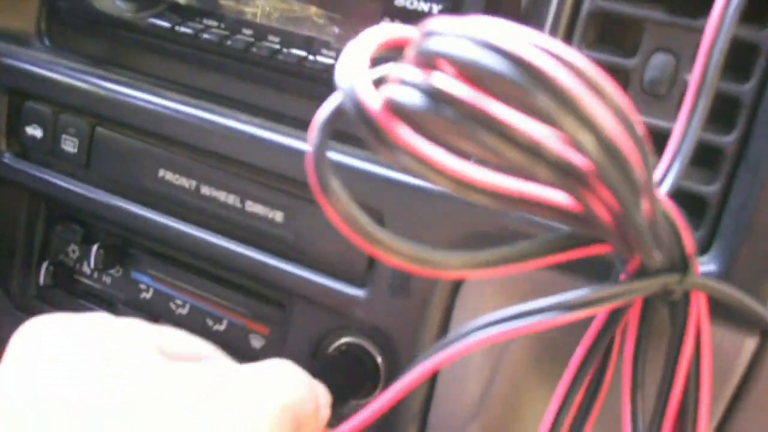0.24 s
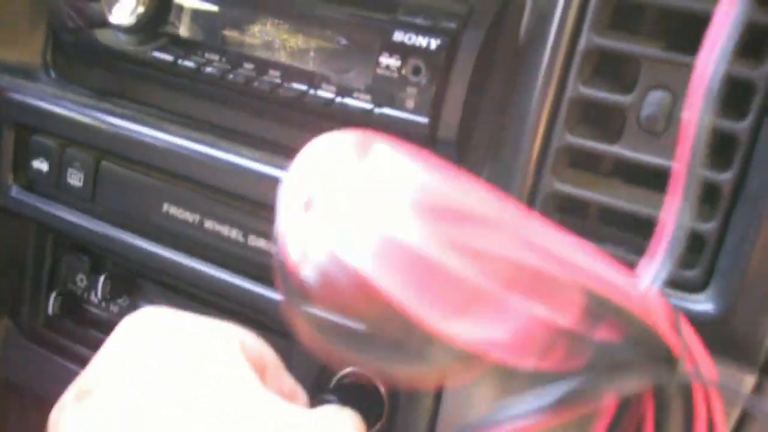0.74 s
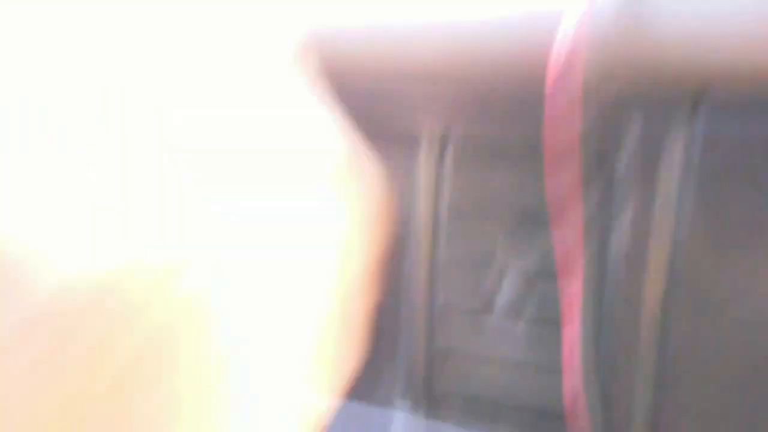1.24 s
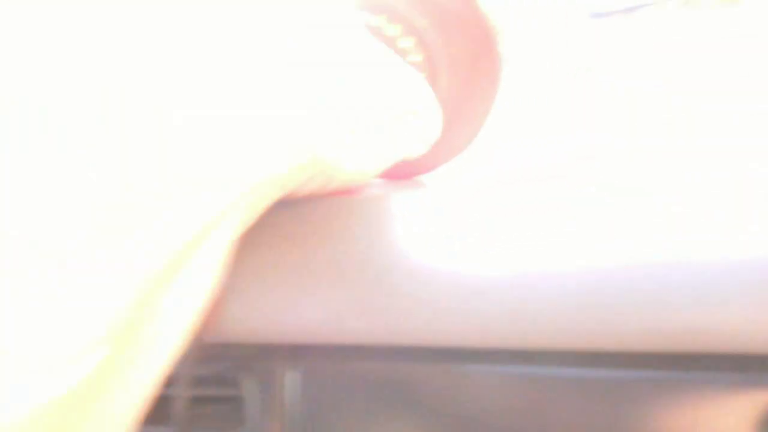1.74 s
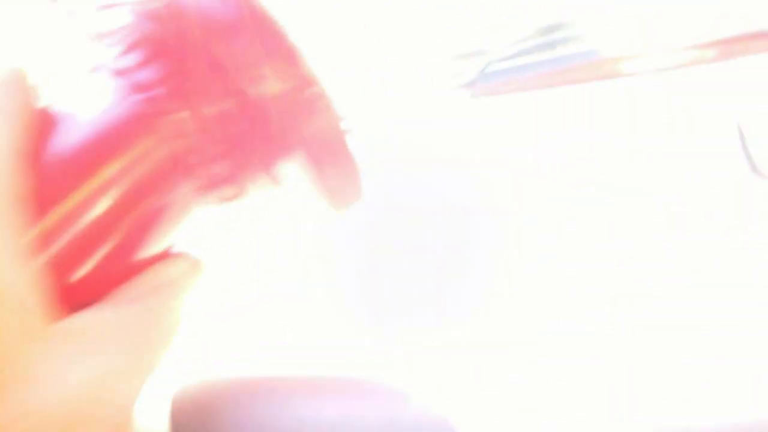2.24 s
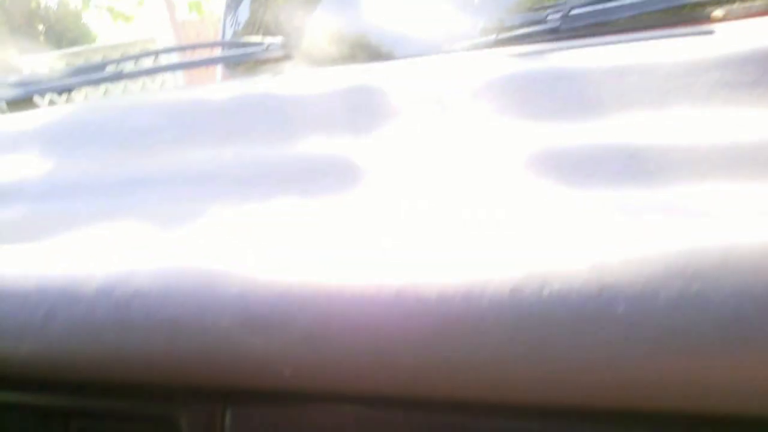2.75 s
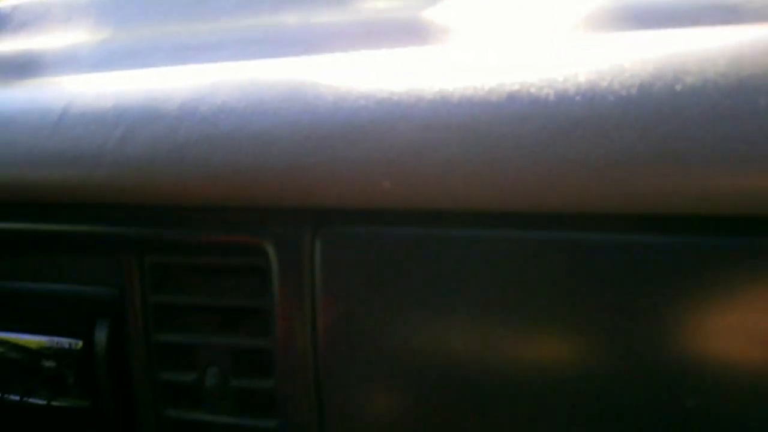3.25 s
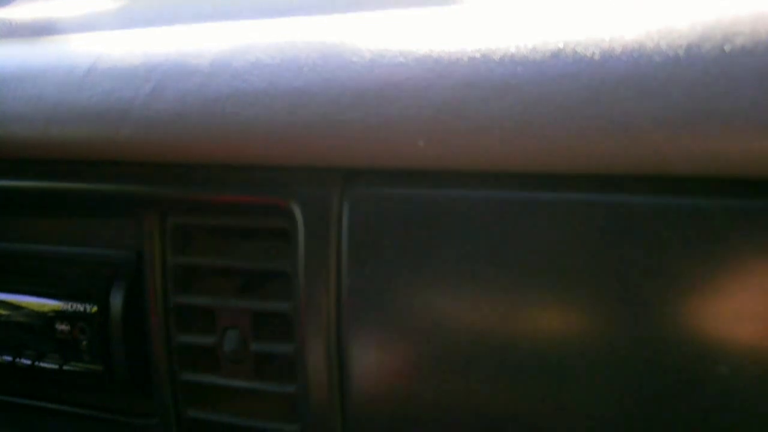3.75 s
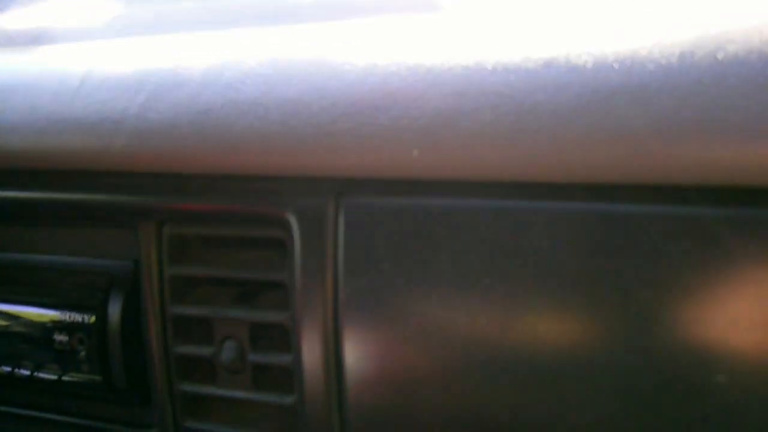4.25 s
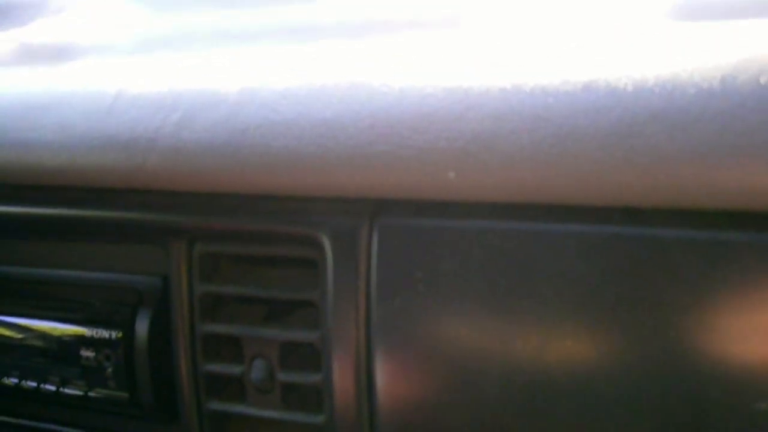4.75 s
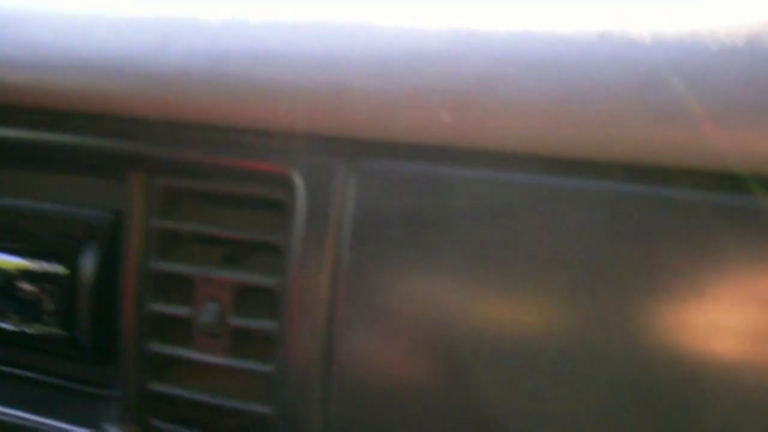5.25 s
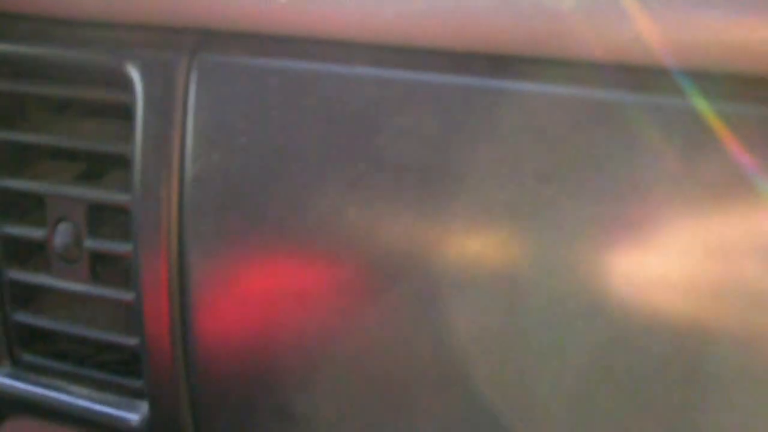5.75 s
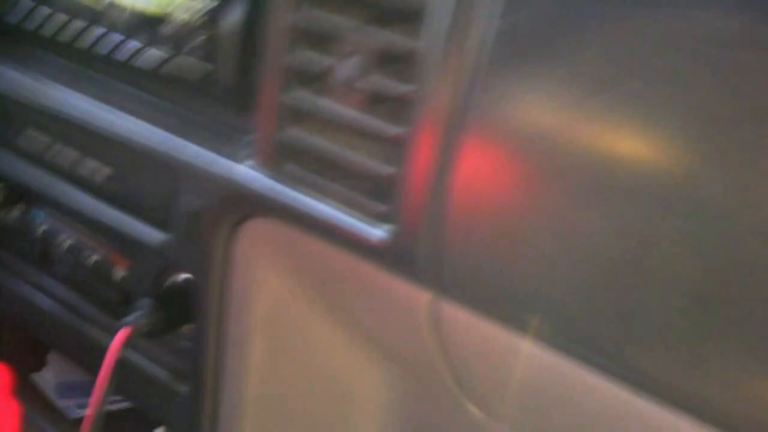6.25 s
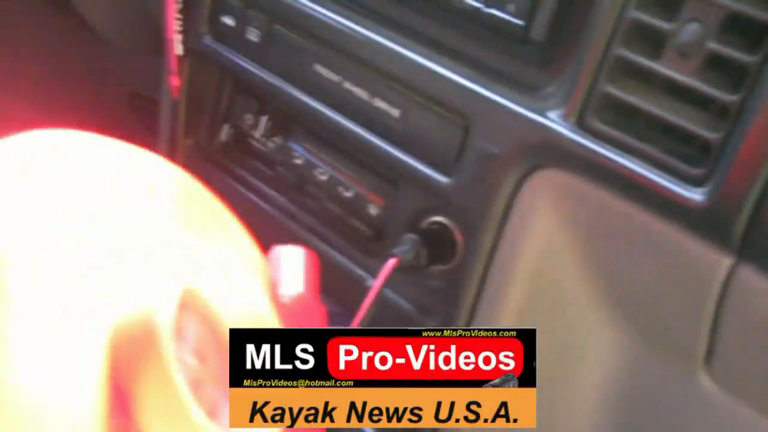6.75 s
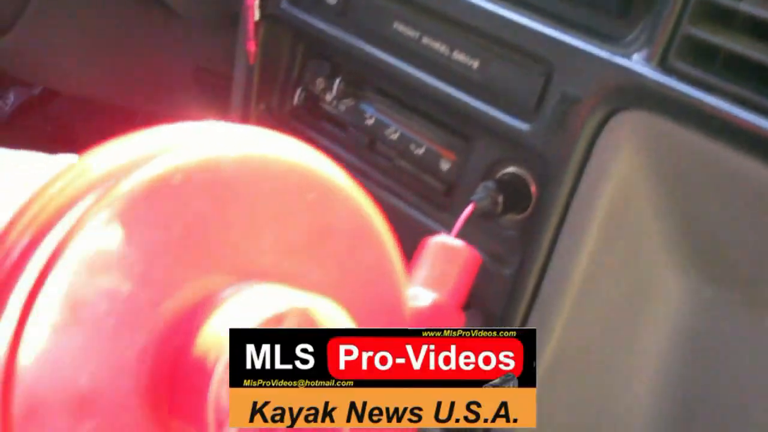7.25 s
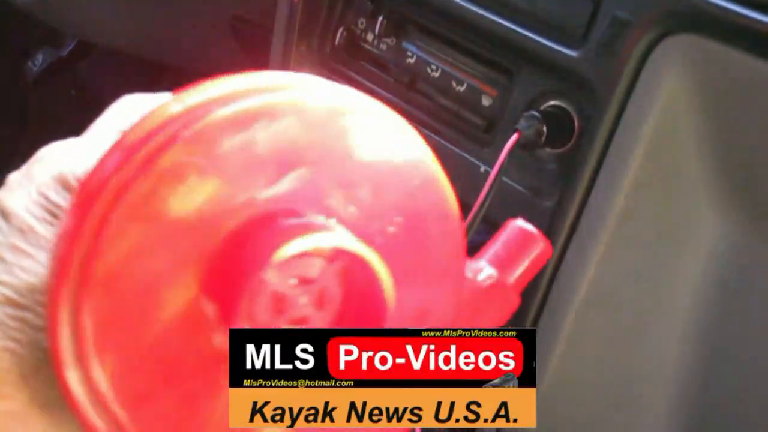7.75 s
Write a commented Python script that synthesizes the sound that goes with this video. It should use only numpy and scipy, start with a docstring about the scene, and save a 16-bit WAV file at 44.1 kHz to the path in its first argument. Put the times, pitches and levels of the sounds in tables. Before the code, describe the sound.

Close, thin-bass sound inside a parked car: hollow hum and hard plastic knocks as a plug is fumbled into a socket, a brief dip, then a small electric blower whines up with rushing air. Switched off, it coasts down through a whirr to near quiet, clicks, and revs again into a steady whine until the end.

```python
"""First a hollow hum in a parked car, with knocks as a hand fumbles a plug into a socket.
The sound dips to near silence, then a switch clicks and a small seven-vane blower whines up, coasts down
and is switched on again to a steady whine. Its tones are sines locked to the turning shaft, over rushing
air made of shaped noise; the pump turns in the hand, so the tones come and go.
Knocks are noise bursts with ringing sines; the car and the rumble outside are shaped noise."""
import sys
import numpy as np
from scipy import signal
from scipy.fft import rfft, irfft
from scipy.io import wavfile
from scipy.ndimage import uniform_filter1d

SR = 44100
rng = np.random.default_rng(int(sys.argv[2]) if len(sys.argv) > 2 else 0)


def dump_mix(stems):
    """Bounce the given channels to the path in sys.argv[1] as a 16-bit WAV at rate SR."""
    frames = np.atleast_2d(stems).T  # one column per channel
    limited = np.clip(frames, -1, 1)  # hard clip at full scale
    pcm = np.round(limited * 32767).astype(np.int16)
    wavfile.write(sys.argv[1], SR, pcm)


def volts_from_decibels(level):
    """Turn decibel levels (scalar or array-like) into linear amplitude factors."""
    exponent = np.asarray(level, float) / 20
    return 10 ** exponent


N = 352800

T = np.arange(N) / SR  # time of every sample, s
FINE_T = np.arange(0, N / SR, 1 / 1000)  # slower clock for speeds and levels, s
EDGE_HZ = 15250  # top edge of the finished sound
# strong tones of the rotor: multiples of the shaft speed
STRONG_ORDERS = (1, 2, 3, 7, 14, 21, 28, 42)
# each run of the motor: on_s, off_s, top_shaft_speed_hz (before a small drift), spin_up_time_constant_s
MOTOR_RUNS = [(0.802, 2.017, 268.1, .279), (4.874, 8.0, 268, .275)]
# colour of the rushing air: frequency_hz, relative_level_db (per Hz)
AIR_COLOUR = [(40, -49.0), (100, -78), (200, -21), (400, -24), (680, -15), (1200, -8), (2100, -5.5),
              (3100, -0.5), (3600, -0.5), (4300, -5), (5200, -5.5), (7200, -6), (8800, -5), (10300, -4),
              (12500, -9.5), (15300, -12.5)]
# casing resonances, plain while coasting: frequency_hz, width_hz, relative_level_db
CASING_RINGS = [(760, 260, 3), (2470, 110, 0), (3350, 300, -5), (4180, 240, 1), (4950, 140, -6),
                (5500, 160, -7), (6900, 250, -8), (9800, 1200, -6), (11500, 1500, -8)]
# the pump as it is held and turned, all as changes:
# time_s, level_db, low_roar_db, top_hiss_db, shaft_tone_db
HAND_MOVES = [(.85, -3.5, 10, -5.5, 4.5), (1.2, -1.5, 12, 6, 18.5), (1.26, 3, 6, -1, 11),
              (1.31, -1.5, 3, 15.5, 5), (1.38, -0.5, -3, 8.5, 11), (1.45, 0.5, -4, 5, 1),
              (1.55, 0.5, -7, -4.5, 1.5), (2.0, 0.5, 0.5, -2.5, -1.5), (2.2, 2.5, 7.5, 2, -1.5),
              (2.35, 3.3, 5.5, 2, -4), (3.0, -1, 6, -1.5, -13), (3.7, -2.5, 6.5, -3.5, -18),
              (4.8, -1.5, -3, 1.5, -18), (4.92, 0.5, 6, -2, -24), (5.05, -0.5, 6.5, 1.5, -14),
              (5.2, 3.5, 2, 1, -11), (5.3, 3, 2.5, 4, -4), (5.6, 0, -1.5, 2.2, -7.5),
              (5.8, -1.5, -2.5, 3.5, 2), (6.2, 0, -3.5, 5.5, 3), (6.5, -2, -6, 2, 2),
              (7.1, -2.5, -8.5, 2.5, -11), (7.55, -1.5, -9.5, 1.5, -15), (8, -1.5, -7, 2.5, -18)]


def shaft_speed(t):
    """Under power the speed closes on its top value; switched off it coasts against drag and friction."""
    # wander of the speed: time_s, change_hz
    speed_drift = [(6.9, 0), (7.45, -.45), (8, .3)]
    # air drag and bearing friction: speed = coast_hz * tan(angle), the angle falling steadily
    coast_hz, fall_rad_per_s = 76.55, .2881
    growl_lag_s = .012  # the growl sets in just after the rotor begins to gain speed
    speed, powered = np.zeros(len(t)), np.zeros(len(t))
    for on, off, top_hz, time_constant_s in MOTOR_RUNS:
        start = np.interp(on, t, speed)
        since = np.clip(t - on, 0, off - on)
        rising = top_hz - (top_hz - start) * np.exp(-since / time_constant_s)
        coast_angle = np.arctan(rising / coast_hz) - fall_rad_per_s * np.maximum(t - off, 0)
        speed = np.where(t > on, coast_hz * np.tan(np.maximum(coast_angle, 0)), speed)
        powered += (t > on + growl_lag_s) & (t <= off)
    return speed + np.interp(t, *np.transpose(speed_drift)), uniform_filter1d(powered, size=12)


def rush_db(t):
    """Level, roar and hiss of the air at times t, from speed, power and the way the pump is held."""
    # air against speed: shaft_speed_hz, relative_level_db, low_roar_lift_db, top_hiss_lift_db
    air_by_speed = [(20, -84, 22, 12), (45, -63, 8.5, 4), (64.6, -58.5, 5.5, 9), (83.3, -51, 3, 3.5),
                    (122.3, -44.5, 4, -1.5), (162.5, -38.5, 3, -3.5), (199, -38, -3.5, -5),
                    (248, -35.5, 9, -1.5)]
    speed, powered = (np.interp(t, FINE_T, v) for v in shaft_speed(FINE_T))
    speed_hz, *by_speed = np.transpose(air_by_speed)
    s, *by_hand = np.transpose(HAND_MOVES)
    level, roar, hiss = (np.interp(speed, speed_hz, a) + np.interp(t, s, b)
                         for a, b in zip(by_speed, by_hand))
    # a slow rotor under power is louder and roars more
    pulling = powered * np.clip(1 - speed / 230, 0, 1)
    level = np.where(t > MOTOR_RUNS[0][0], level + 11 * pulling, -120)
    return level, roar + 2.5 * pulling, hiss


def buried_db(t):
    """Tones are lost in the growl while the motor pulls up from low speed."""
    most_db, below_hz = -11, 180
    speed, powered = shaft_speed(FINE_T)
    return np.interp(t, FINE_T, most_db * powered * np.clip(2 - 2 * speed / below_hz, 0, 1))


def rotor():
    """Speed, shaft angle and the levels of the strong tones, sample by sample."""
    # one row per strong order: level_against_air_db, change_while_coasting_db
    strong_levels = [(-12.5, 1), (-11.5, -6.5), (-14.5, -14), (2.5, -3), (-1, 0), (-2, 3), (-6.5, 5.5),
                     (-17, -3.5)]
    # how casing and cabin pass a tone: frequency_hz, gain_db
    tone_path = [(70, -30), (110, 0), (200, -15.5), (265, -5), (400, -11.5), (460, -3), (560, 7), (700, 8),
                 (800, -3.5), (1000, -2.5), (1200, -3), (1500, -4.5), (1750, 2), (1880, -5), (2200, 2.5),
                 (2600, 5), (2900, 7.5), (3150, 5), (3350, 1), (3550, 1.5), (3750, 3), (4000, -3.5),
                 (4400, -2), (4800, -10.5), (5200, 6), (5600, 3.5), (6000, 6), (6500, 13), (7500, -.5),
                 (11200, 12.5)]
    # the second order swells and fades: time_s, change_db
    second_order_swell = [(1.2, 0), (1.45, -5), (1.9, -14), (2.15, -7.5), (5.3, -6), (5.6, -3), (5.95, 4),
                          (6.4, 2), (7.2, -1.5), (8, -6.5)]
    # vane tones swell and fade as the pump turns:
    # time_s, order_7_db, order_14_db, order_21_db, order_28_db, order_42_db
    vane_swell = [(1.23, -5, 1.5, 2.5, -16, -8), (1.32, -19, -11, 6, -2.5, -8),
                  (1.45, -5, -2, -5.5, -29, 1.5), (1.68, -1.5, 6.5, -5, -13, -0.5),
                  (1.9, -0.5, 3, -9, 1, 5), (2.05, -8, -2.5, -9, -17, 4), (2.3, -3.5, -1.5, -8, -14, 2),
                  (2.7, -4, -9, -1.5, -1, -.1), (3.0, 4, -5, -5.5, -17.5, 7), (3.6, 0, 0, -10, -8.5, -3),
                  (4.15, -12, -6, -17, -15, -11), (4.85, 1, -8, 3, -16, -10), (5.1, -2, -8, -0.5, 1, 2),
                  (5.5, -6.7, -2, -2, -16, -5), (5.75, -11, 8.2, -1.5, -15, -10), (5.95, -5.5, 1, 3, 1, 1),
                  (6.14, 0, -10.5, 2, 5, -14), (6.3, 0.3, 6.5, -4, -8, -5),
                  (6.6, 1.5, 6.5, -4.5, 5.5, -1.5), (7.0, 3, 8.5, -10, 3, -1.5), (7.2, 0.5, 8, -6, 1, 5.5),
                  (7.45, 4, 5, -3.8, 3, 0), (8, 5.5, -3, -6.5, 8, -0.5)]
    speed, powered = shaft_speed(FINE_T)
    shaft_move = np.interp(FINE_T, *np.transpose(HAND_MOVES)[[0, -1]])
    second_move = np.interp(FINE_T, *np.transpose(second_order_swell))
    s, *swells = np.transpose(vane_swell)
    moves = [shaft_move, second_move, 0 * shaft_move]
    moves += [np.interp(FINE_T, s, swell, left=0) for swell in swells]
    air_db, loss_db = rush_db(FINE_T)[0], buried_db(FINE_T)
    levels = []
    for k, (db, coasting_db), move in zip(STRONG_ORDERS, strong_levels, moves):
        level = air_db + db + coasting_db * (1 - powered) + curve_db(tone_path, k * speed) + move
        level = level + (k > 1) * loss_db  # the shaft tone itself is never buried
        levels.append(np.interp(T, FINE_T, level))
    speed = np.interp(T, FINE_T, speed)
    angle = 2 * np.pi * np.cumsum(speed) / SR
    return speed, angle, levels


def whine(speed, angle, levels):
    """Sines on shaft orders; while the speed changes they break up, sweeping through standing waves."""
    # weaker tones: multiple_of_shaft_speed, level_against_air_db
    weak_orders = [(4, -9.5), (5, -8), (6, -13), (8, -18), (9, -10.5), (11, -16.5), (13, -13), (35, -7),
                   (49, -3), (56, -3)]
    # higher harmonics of the seven vanes, which drop into hearing while the rotor is slow
    upper_vanes = [(k, -7) for k in range(63, 154, 7)]
    step = 64  # samples between level updates
    coarse_t, coarse = T[::step], speed[::step]
    air_db = rush_db(coarse_t)[0] + buried_db(coarse_t)
    slow = np.clip(1 - coarse / 230, 0, 1)
    sweeping = np.clip(abs(np.gradient(coarse)) * SR / step / (coarse + 1) / .3, .1, 1)
    # one value per Hz, with narrow dips where two random paths cancel
    paths = uniform_filter1d(uniform_filter1d(rng.standard_normal((2, SR)), size=75), size=75)
    standing = np.log(np.hypot(*paths))
    standing = np.clip(evened(standing - standing.mean()), -3, .7)
    tremble = 1 + 0.15 * evened(uniform_filter1d(rng.standard_normal((len(STRONG_ORDERS), N)), size=300))
    out = np.zeros(N)
    for k, db, wobble in zip(STRONG_ORDERS, levels, tremble):
        broken_db = -1 + 5.5 * sweeping * standing[(k * coarse).astype(int)]
        gain = volts_from_decibels(db + np.interp(T, coarse_t, broken_db)) * wobble
        out += gain * np.cos(k * angle + 2 * np.pi * rng.random())
    for k, db in weak_orders + upper_vanes:  # these follow the level and colour of the air
        hz = k * coarse
        drift = uniform_filter1d(uniform_filter1d(rng.standard_normal(len(hz)), size=120), size=120)
        level_db = db + 3.74 * evened(drift) + 5 * sweeping * standing[hz.astype(int)] + air_db
        gain = volts_from_decibels(level_db + curve_db(AIR_COLOUR, hz)) * (volts_from_decibels(-3) * casing_gain(hz)) ** slow
        gain = np.interp(T, coarse_t, gain * (hz < EDGE_HZ))
        out += gain * np.cos(k * angle + 2 * np.pi * rng.random())
    fade_in = np.clip((T - MOTOR_RUNS[0][0]) / 0.044, 0, 1)
    return np.sqrt(2) * out * fade_in


def faint_orders(angle):
    """One uneven wave shape, repeated every turn, puts a faint line on each shaft order from 8 to 55."""
    turn, k = np.linspace(0, 2 * np.pi, 4097), np.arange(8, 56)[:, None]
    sizes, phases = rng.random((2, len(k), 1))
    shape = evened((sizes * np.cos(k * turn + 2 * np.pi * phases)).sum(0))
    level = volts_from_decibels(rush_db(FINE_T)[0] - 14 + buried_db(FINE_T))  # 14 dB under the air level
    return np.interp(T, FINE_T, level) * np.interp(angle % (2 * np.pi), turn, shape)


def ticks(speed, angle):
    """One tick a turn rings the casing resonances: a whirr of close gliding lines."""
    fade_out_hz = 150  # shaft speed at which the ticks are gone
    turns = np.diff(angle // (2 * np.pi), prepend=0) * (1 + .15 * rng.standard_normal(N))
    t = np.arange(1500) / SR
    ring = np.zeros(len(t))
    for hz, width_hz, db in CASING_RINGS[:-2]:  # without the last two, which are very broad
        size = volts_from_decibels(db) * width_hz * 1000 / (hz + 900)
        ring += size * np.exp(-np.pi * width_hz * t) * np.sin(2 * np.pi * hz * t)
    ring = signal.sosfilt(signal.butter(4, 520, "highpass", fs=SR, output="sos"), ring)
    level = np.interp(T, FINE_T, volts_from_decibels(rush_db(FINE_T)[0] - 3.5))
    # the root keeps the power even as ticks come closer together
    size = level * np.clip(2 - 2 * speed / fade_out_hz, 0, 1) * np.sqrt(SR / (speed + 1))
    return signal.oaconvolve(turns * size, ring / np.linalg.norm(ring))[:N]


def air(speed, angle):
    """Turbulent rush, chopped a little each turn; at low speed the casing resonances stand out."""
    def field(t, hz):
        slow = np.clip(1 - np.interp(t, T, speed) / 215, 0, .85)
        low = 1 / (1 + (hz / 1400) ** 4) / (1 + (350 / (hz + 1)) ** 4)
        top = 1 / (1 + (7500 / (hz + 1)) ** 8)
        level, roar_db, hiss_db = rush_db(t)
        tilt_db = low * roar_db + top * hiss_db
        ring_db = slow * (28 * np.log10(casing_gain(hz)) + 13)
        return curve_db(AIR_COLOUR, hz) - band_db(AIR_COLOUR, 2000, 7000) + level + tilt_db + ring_db
    flutter = 0.056 + 0.073 * np.clip(1 - speed / 120, 0, 1)  # a slow rotor is heard turn by turn
    return volts_from_decibels(2) * noise(field, patchy_db=1.83, flicker_db=0.55) * (1 + flutter * np.cos(angle))


def knocks():
    """Each knock is a burst of rattling plastic, a treble snap, the ring of the hollow panel and a thud."""
    # plug knocks and switch clicks, levels before the trims below:
    # time_s, rattle_db, panel_ring_db, treble_snap_db, deep_thud_db
    knock_list = [(0.0566, -53, -38, -47, -66), (0.1906, -46, -26, -46, -61), (0.2124, -22, -26, -39, -62),
                  (0.2493, -11.5, -22.5, -25, -50.5), (0.302, -21, -26.5, -27, -49),
                  (0.3917, -50, -30.5, -55, -65), (0.5022, -49, -37, -52, -62),
                  (0.5566, -40, -31.5, -23, -49), (0.5705, -18.5, -28, -35, -50),
                  (0.5866, -17.5, -28.5, -57, -35), (0.6263, -50, -59, -33, -41.5),
                  (0.7266, -40, -58, -55, -78), (0.8027, -40, -53, -29.5, -67),
                  (0.8847, -21.5, -32, -28, -35), (1.2091, -12, -45, -40, -37),
                  (4.44, -55, -66, -41.5, -83), (4.462, -55, -69, -45, -81), (4.8867, -56, -64, -18, -87),
                  (6.549, -21, -36, -68, -57)]
    # what a knock rings: frequency_hz, relative_level_db, time_to_fall_60_db_s (held to 0.09 at most)
    panel_rings = [(402, -7, 5.0), (569.6, 0, 0.094), (860, -1.5, 0.038), (2030, -13, 0.19),
                   (2840, -16.5, 0.12), (3830, -37, 0.054), (4250, -51, 0.077), (5060, -19, 0.016)]
    rattle_t60_s, snap_t60_s, thud_t60_s, thud_hz = 0.061, 0.024, 0.12, 200
    out, t = np.zeros(N + 8000), np.arange(8000) / SR
    rattle_band = signal.butter(2, (700, 4500), "bandpass", fs=SR)
    snap_band = signal.butter(2, (3000, 12000), "bandpass", fs=SR)
    thud = volts_from_decibels(-60 * t / thud_t60_s) * np.sin(2 * np.pi * thud_hz * t) * (1 - np.exp(-t / 0.0007))
    for s, rattle_db, ring_db, snap_db, thud_db in knock_list:
        rattle, snap = rng.standard_normal((2, len(t)))
        rattle = evened(signal.lfilter(*rattle_band, rattle))
        snap = evened(signal.lfilter(*snap_band, snap))
        ring = np.zeros(len(t))
        for hz, db, t60_s in panel_rings:
            detune, phase = rng.uniform(0.9, 1.05), rng.random()
            ring += volts_from_decibels(db - 60 * t / min(t60_s, .09)) * np.sin(2 * np.pi * (hz * detune * t + phase))
        sound = volts_from_decibels(rattle_db - 12 - 60 * t / rattle_t60_s) * rattle
        sound += volts_from_decibels(snap_db + 0.5 - 60 * t / snap_t60_s) * snap
        sound += volts_from_decibels(ring_db + 3.5) * ring / np.abs(ring).max()
        sound += volts_from_decibels(thud_db + 5.0) * thud
        at = round(s * SR)
        out[at:at + len(t)] += sound * (1 - np.exp(-t / 0.00069))  # soft onset
    return out[:N]


def cabin():
    """Hollow hum and hiss of the car interior at the start, and a faint rumble from outside that stays."""
    # interior level, silent after the last row: time_s, relative_level_db
    cabin_level = [(0, -49), (.41, -48), (.55, -47.5), (.64, -48.5), (.68, -53), (.705, -75), (.79, -64.5),
                   (.84, -56)]
    # interior colour: frequency_hz, relative_level_db (per Hz)
    cabin_colour = [(18, -56), (30, -33), (224, -6), (306, -9.5), (572, -4), (686, -12.5), (868, -10.5),
                    (1220, -12), (2050, -18.5), (2460, -21.5), (15300, -25)]
    # colour of the outside rumble: frequency_hz, relative_level_db (per Hz)
    rumble_colour = [(18, -64), (30, -34), (87, -24), (108, 0), (150, -3), (298, 1.5), (500, -32),
                     (650, -43), (1100, -120)]
    s, db = np.transpose(cabin_level)

    def inside(t, hz):
        colour_db = curve_db(cabin_colour, hz) - band_db(cabin_colour, 200, 11000)
        return colour_db + np.interp(t, s, db, right=-120)

    def outside(t, hz):
        return curve_db(rumble_colour, hz) - 60 * (hz > rumble_colour[-1][0]) + 0 * t
    rumble = evened(noise(outside, patchy_db=3.5, flicker_db=2.5, size=2048))
    return volts_from_decibels(6.5) * noise(inside, patchy_db=2.0, flicker_db=1.7) + volts_from_decibels(-75.5) * rumble


def noise(db_field, patchy_db, flicker_db, size=512):
    """Random short-time spectra shaped by db_field(t, hz), with drifting patches and wide flicker."""
    frames, hz = N * 4 // size + 5, np.fft.rfftfreq(size, 1 / SR)[:, None]
    a, b, patches = rng.standard_normal((frames, len(hz), 3)).T
    patches = evened(uniform_filter1d(uniform_filter1d(patches, size=8, axis=0), size=24, axis=1))
    flicker = evened(uniform_filter1d(rng.standard_normal(frames), size=4))
    t = np.arange(frames) * size / 4 / SR
    z = (a + 1j * b) * volts_from_decibels(db_field(t, hz) + patchy_db * patches + flicker_db * flicker)
    return signal.istft(z, nperseg=size, noverlap=size * 3 // 4)[1][:N]


def casing_gain(hz):
    """Power sum of the casing resonances over a flat bed."""
    peaks = sum(volts_from_decibels(2 * db) / (1 + (2 * (hz - f) / width) ** 2) for f, width, db in CASING_RINGS)
    return np.sqrt(volts_from_decibels(-32) + peaks)


def band_db(points, lo_hz, hi_hz, size=512):
    """Summed level of a spectrum within one band."""
    hz = np.fft.rfftfreq(size, 1 / SR)
    inside = hz[(hz > lo_hz) & (hz < hi_hz)]
    return 10 * np.log10(np.sum(volts_from_decibels(2 * curve_db(points, inside))))


def curve_db(points, hz):
    """Reads a curve of (Hz, dB) points along a logarithmic frequency scale."""
    f, value = np.transpose(points)
    return np.interp(np.log(hz + 1), np.log(f + 1), value)


def evened(x):
    """Scales a signal to an rms of one."""
    return x / np.sqrt(np.mean(x ** 2) + 1e-20)


def scene():
    """The blower, the knocks and the car added up, the same in both channels."""
    speed, angle, levels = rotor()
    tones = whine(speed, angle, levels) + faint_orders(angle) + ticks(speed, angle)
    pump = tones + air(speed, angle)
    mono = pump + knocks() + cabin()
    return np.array([mono, mono])


def roll_off(x):
    """The treble ends steeply here."""
    return signal.sosfilt(signal.butter(12, 16510, fs=SR, output="sos"), x)


def record(dry):
    """The finished sound: weak bass, a narrow notch near 7.8 kHz and a sharp top edge."""
    notch_hz, notch_width_hz, notch_db = 7840, 90, -14
    hz = np.fft.rfftfreq(N, 1 / SR)
    notch = volts_from_decibels(notch_db * np.exp(-((hz - notch_hz) / notch_width_hz) ** 2))
    edge = volts_from_decibels(-.2 * np.clip(hz - EDGE_HZ, 0, 300))  # falls 60 dB within 300 Hz
    weak_bass = 1 / np.sqrt(1 + (70 / (hz + 1)) ** 4)
    mix = irfft(rfft(dry) * notch * edge * weak_bass, N)
    return roll_off(mix)


dry = scene()
out = record(dry)
dump_mix(out)
```